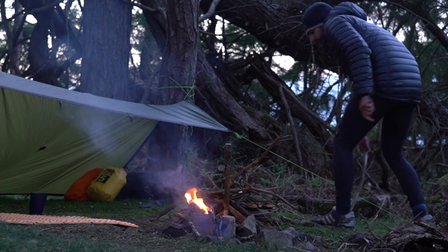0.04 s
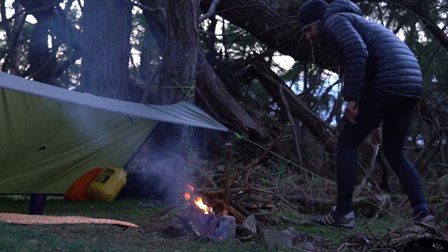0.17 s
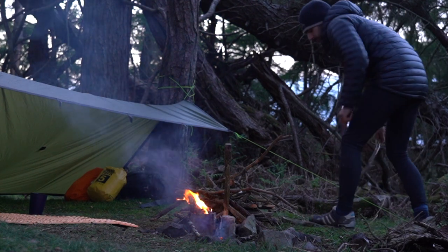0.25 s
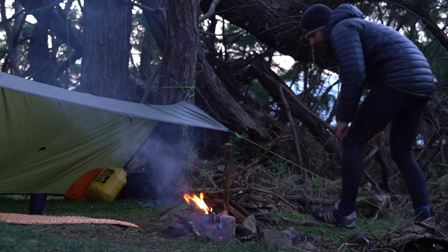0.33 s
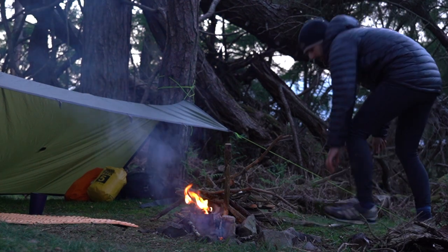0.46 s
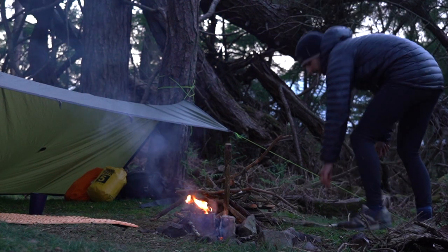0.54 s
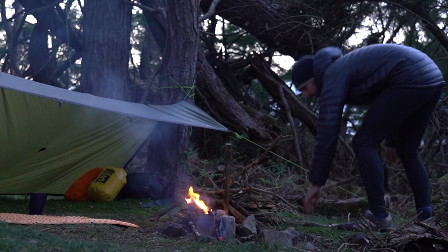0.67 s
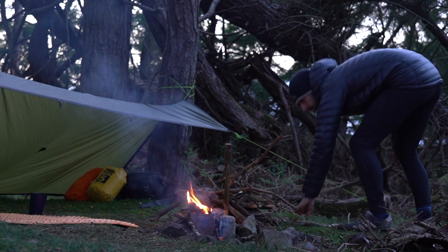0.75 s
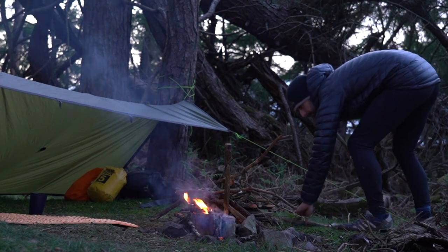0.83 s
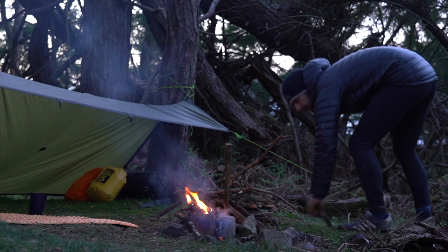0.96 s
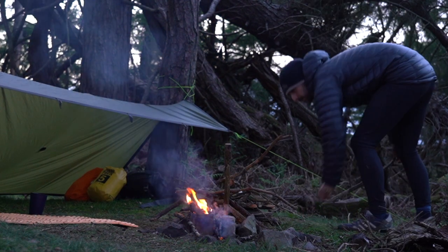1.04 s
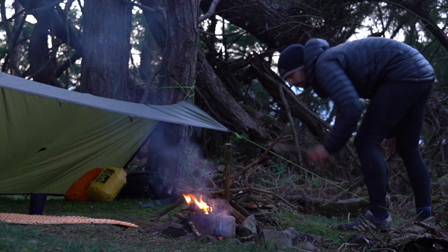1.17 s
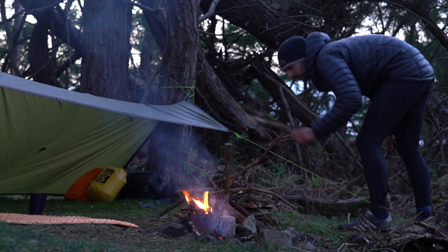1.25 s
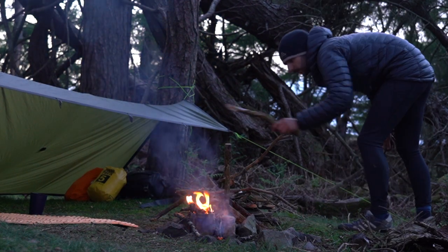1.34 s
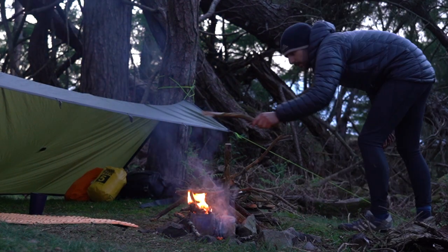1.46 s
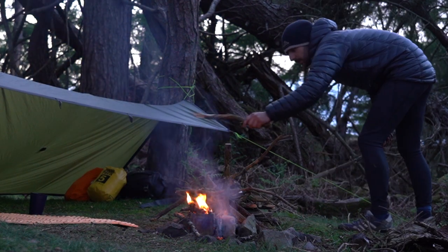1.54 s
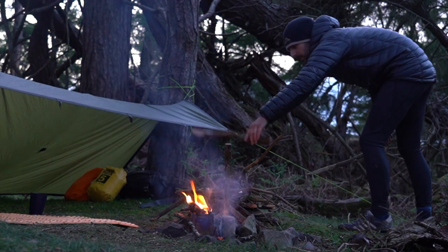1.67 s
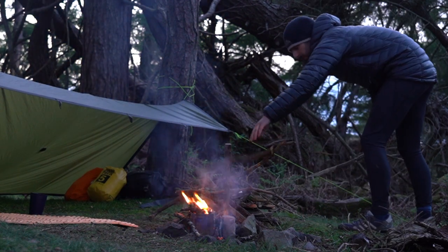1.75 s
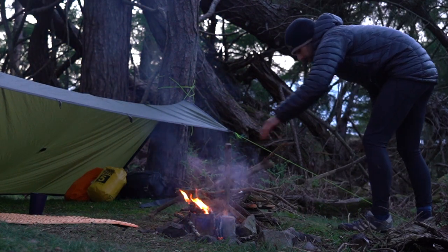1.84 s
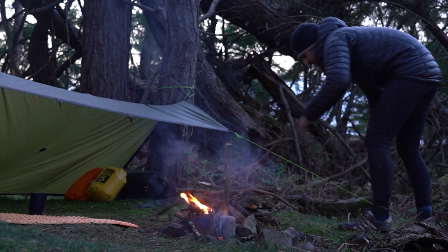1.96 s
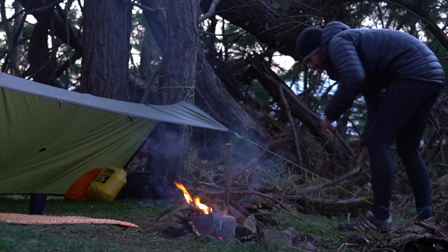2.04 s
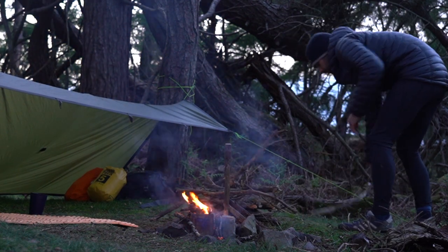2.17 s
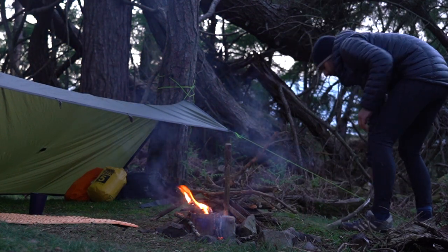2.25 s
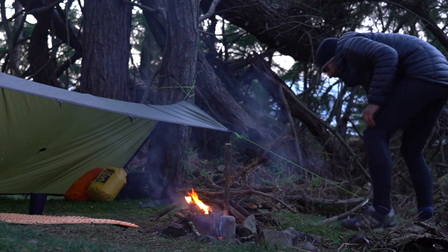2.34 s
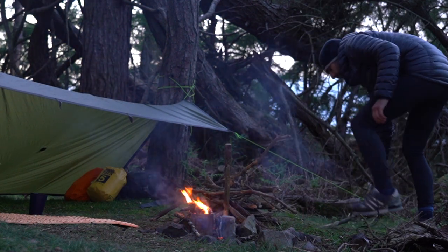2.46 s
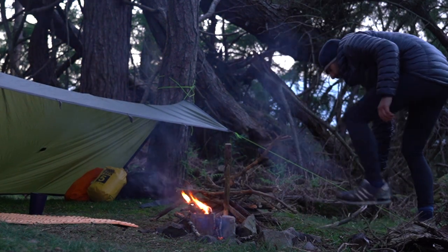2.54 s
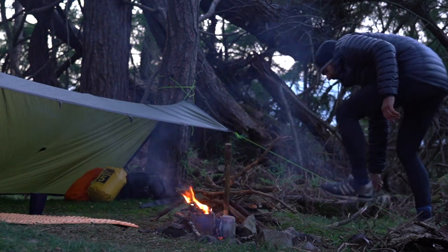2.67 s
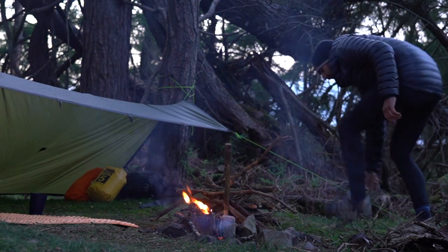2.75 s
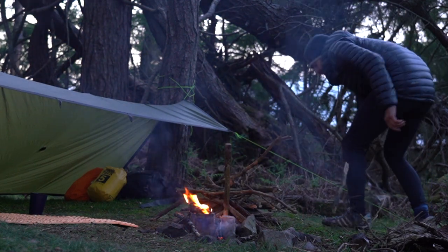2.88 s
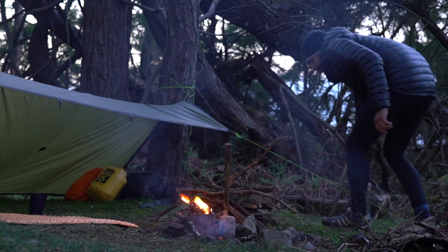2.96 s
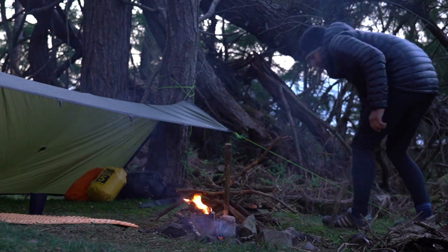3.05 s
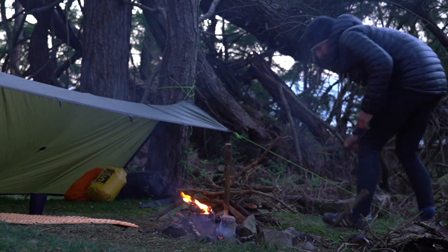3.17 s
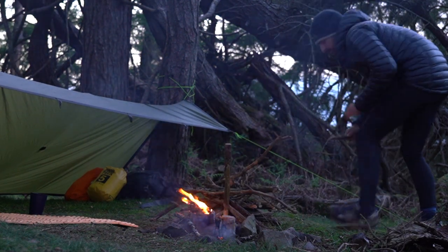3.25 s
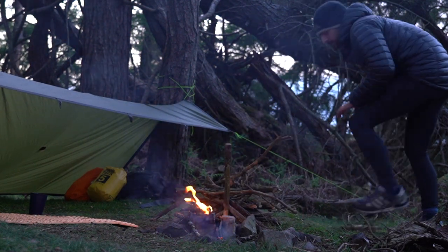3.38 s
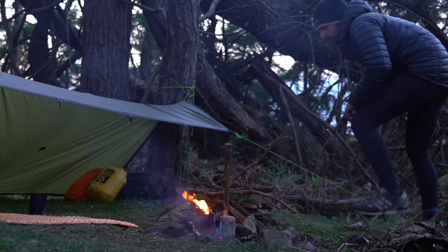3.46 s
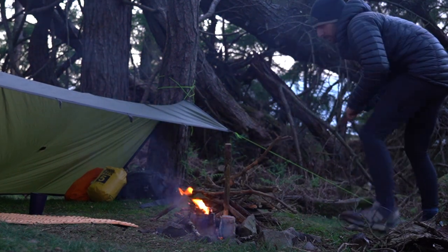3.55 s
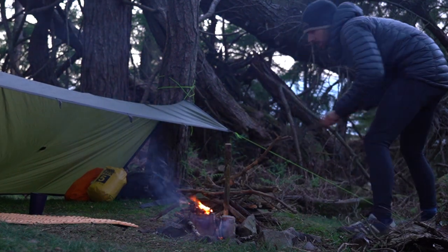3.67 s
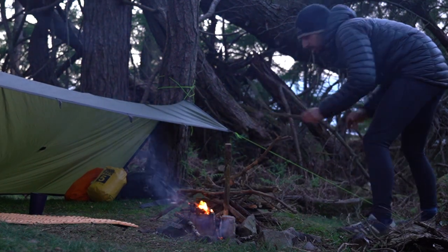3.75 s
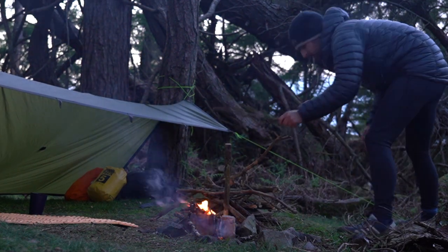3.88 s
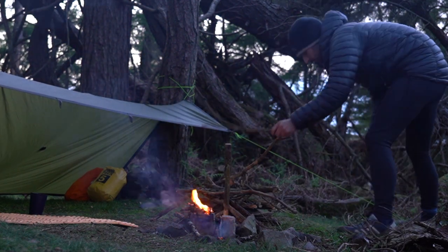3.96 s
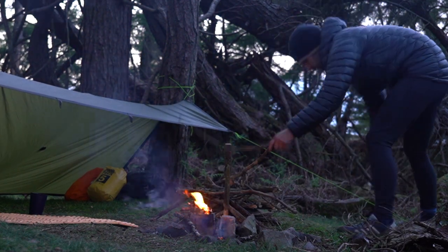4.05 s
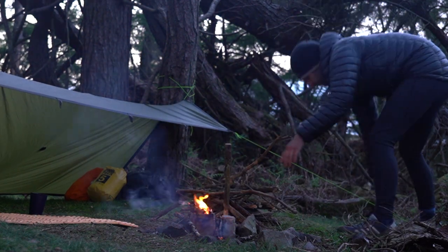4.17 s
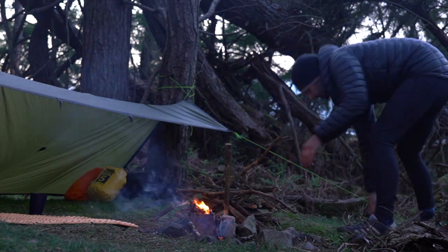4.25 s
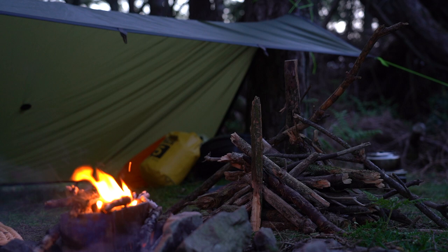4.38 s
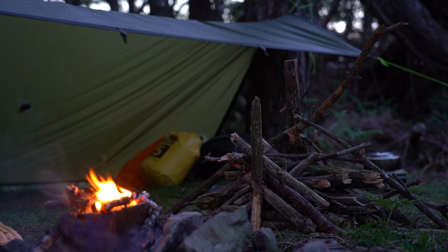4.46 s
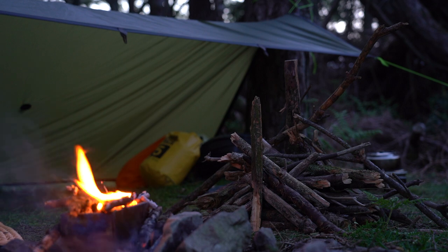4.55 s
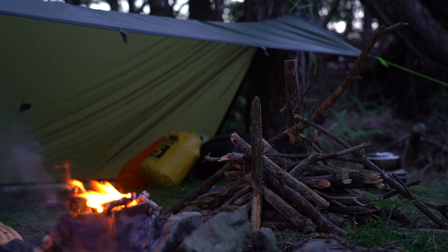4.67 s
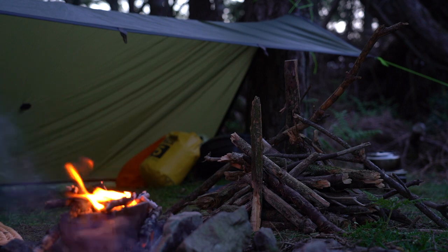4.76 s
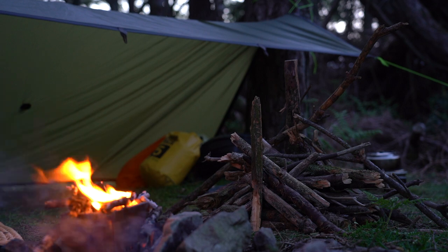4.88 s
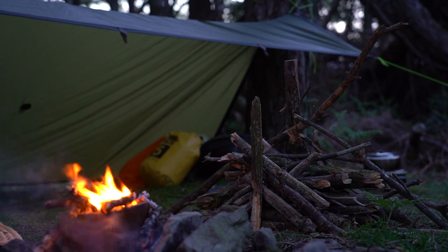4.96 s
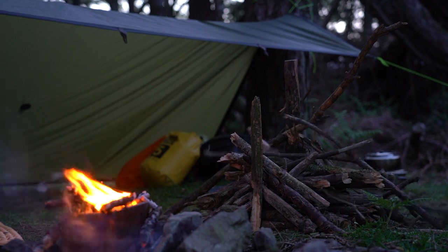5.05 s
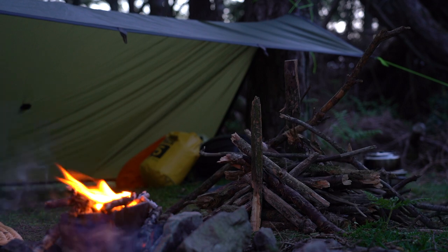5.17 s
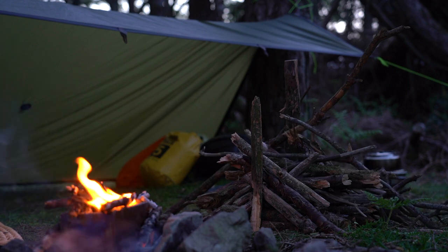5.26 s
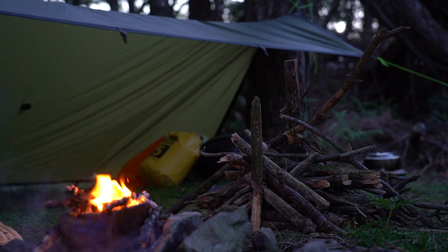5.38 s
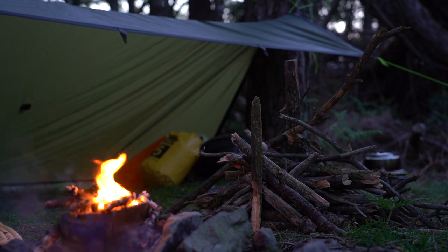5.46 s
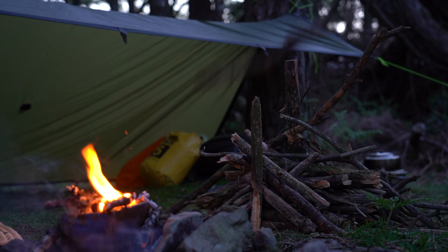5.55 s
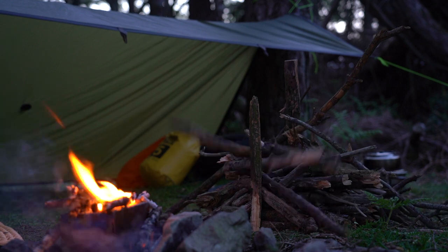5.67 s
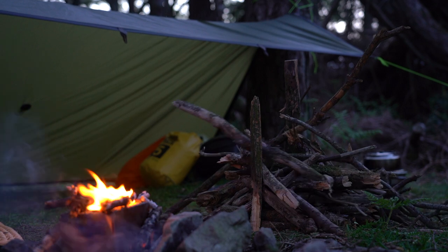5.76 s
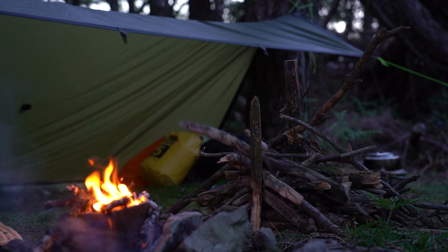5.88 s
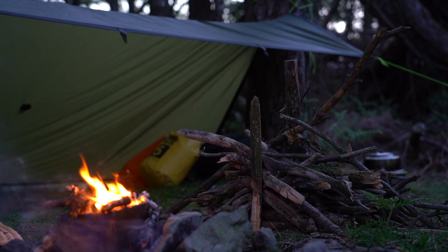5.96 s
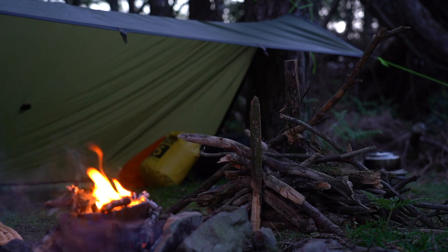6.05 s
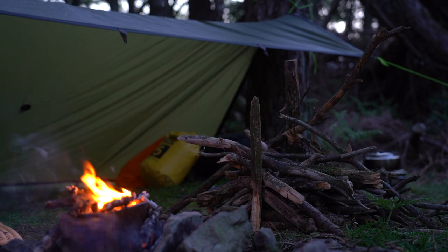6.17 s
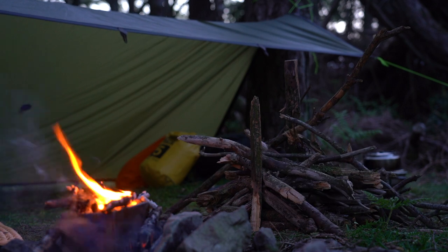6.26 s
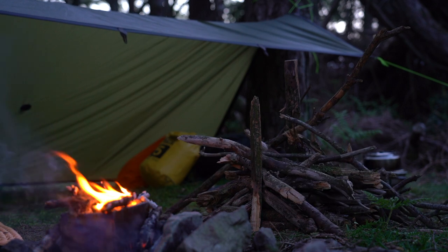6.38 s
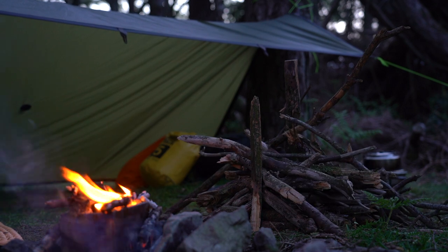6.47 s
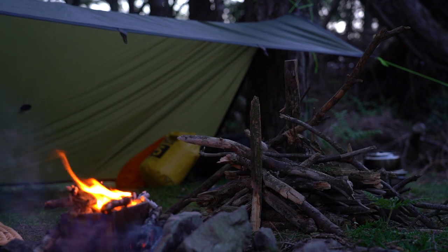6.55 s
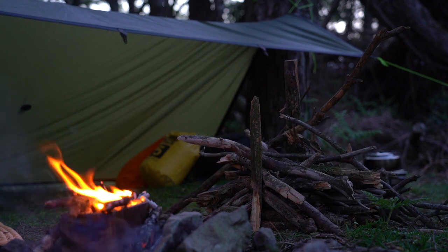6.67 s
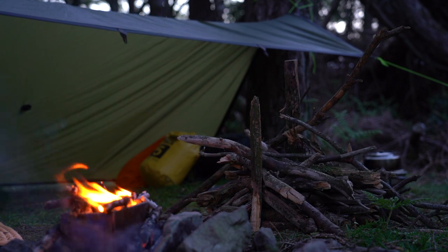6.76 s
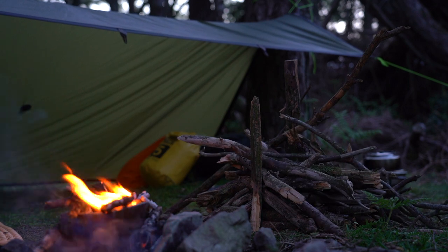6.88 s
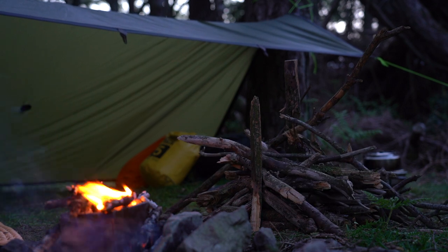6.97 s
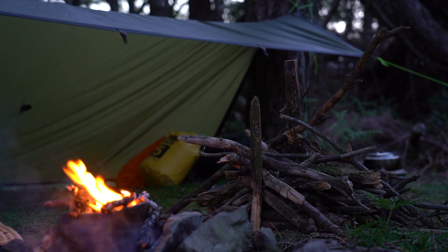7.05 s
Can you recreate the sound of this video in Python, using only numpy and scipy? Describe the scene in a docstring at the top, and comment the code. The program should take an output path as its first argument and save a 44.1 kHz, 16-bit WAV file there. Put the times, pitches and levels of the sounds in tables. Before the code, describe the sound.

A padded jacket swishes close by over a low, steady forest rush and tiny fire ticks. After nearly two seconds, sticks knock together, then a very loud snap near 2.8 seconds scatters splinters and dull thuds. Songbirds chirp between breaks. Two more crackling clusters come around 5 and 5.7 seconds, then small crunches. Wood is close and nearly dry; birds ring through the trees.

```python
"""Dead sticks are snapped by hand and underfoot at a camp among conifers, and the pieces clatter onto a woodpile.
Each break is a spray of tearing fibres that rings the stick; bark and twigs crunch in clumps of small fractures.
Wood and boots knock on the soil as damped low modes, and soles scrape the litter in uneven slips.
A padded jacket swishes in tiny slips of cloth, a small fire ticks in bright noise pops,
and songbirds call in sliding whistles over the steady filtered-noise rush of the forest."""
import sys
import numpy as np
from scipy import signal
from scipy.fft import rfft, irfft, next_fast_len
from scipy.io import wavfile

SR = 44100
rng = np.random.default_rng(int(sys.argv[2]) if len(sys.argv) > 2 else 0)


def put_to_file(sound):
    """Save the sound as 16-bit audio at rate SR, in the file named by the first command-line argument."""
    columns = np.atleast_2d(sound).T  # one column per channel
    safe = np.clip(columns, -1, 1)
    whole_steps = np.round(safe * 32767)
    wavfile.write(sys.argv[1], SR, whole_steps.astype(np.int16))


N = 313992
TIME = np.arange(N) / SR
BLOW = TIME[:2 ** 13]   # time within one blow
CUTOFF_HZ = 16000

# Far rush of the forest. Each row: frequency in Hz, density in dB per Hz.
FOREST_SPECTRUM = [(36, -11), (52, -3), (80, -9.5), (130, -9.5), (250, -9.5), (470, -14.5), (700, -14),
                   (910, -11), (1250, -20), (1700, -24), (2700, -47.5), (4500, -30), (7000, -46),
                   (16000, -75)]
# Puffs of air on the microphone. Each row: peak time in seconds, rise in s, fall in s, relative level in dB.
AIR_PUFFS = [(.29, .4, 0.097, -35), (3.9, 0.15, .2, -44), (5.49, 0.55, 0.53, -36.5), (6.81, 0.16, .25, -42)]
# Strokes of the jacket sleeves. Each row: peak time in seconds, rise in s, fall in s,
# relative swish level in dB, relative fine hiss level in dB.
SLEEVE_STROKES = [(0.0, .04, 0.073, -23.5, -39), (.05, 0.08, 0.19, -27.5, -64),
                  (.815, 0.5, 0.045, -33.5, -50), (1.02, 0.078, 0.18, -41, -50.5),
                  (1.72, 0.14, 0.048, -48, -55), (2.14, 0.35, 0.23, -42, -54),
                  (2.98, 0.092, 0.21, -31, -63), (4.18, 0.36, .15, -40.5, -54.5),
                  (4.385, 0.066, .045, -42.5, -47), (4.73, 0.43, 0.31, -39.5, -52.5),
                  (4.865, 0.022, 0.0097, -52, -45), (5.21, .08, 0.31, -44, -52),
                  (5.915, 0.066, .035, -46.5, -44.5), (6.05, 0.033, 0.013, -46, -38),
                  (6.655, 0.021, 0.046, -36.5, -48), (6.9, 0.24, 0.38, -48, -60)]
# Swish of the cloth. Each row: frequency in Hz, density in dB per Hz.
CLOTH_SPECTRUM = [(200, -26.5), (330, -8.5), (600, -6.5), (860, -1), (1150, -6.5), (1600, -5), (2200, -3),
                  (2900, -4.5), (3500, -2.5), (4200, -11), (5400, -11.5), (6300, -21), (10000, -33.5),
                  (15000, -44)]
# Fine hiss of the cloth. Each row: frequency in Hz, density in dB per Hz.
HISS_SPECTRUM = [(3000, -10), (5000, 7), (6400, -1), (9500, 1), (15000, -3)]
# Clearest dry ticks of embers and twigs. Each row: start in seconds, peak level in dB.
CLEAR_TICKS = [(1.096, -28), (1.1835, -28.5), (1.235, -31), (1.9424, -21), (2.1974, -22), (2.611, -27),
               (3.547, -21.5), (4.5286, -24), (4.6119, -32), (4.966, -22.5), (5.2685, -28), (5.842, -24.5),
               (6.119, -30), (6.412, -25), (6.6433, -24), (6.8053, -26), (6.8143, -17), (6.9664, -25)]
# Heavy wood and boots on the ground. Each row: start in seconds, relative level in dB, pitch in Hz, t60 in s.
GROUND_KNOCKS = [(.591, -21, 237, 0.04), (1.742, -19.5, 300, .07), (1.849, -13.5, 216, 0.036),
                 (2.016, -20, 330, .049), (2.035, -24, 187, 0.081), (2.294, -23, 150, 0.079),
                 (2.8071, -8, 260, 0.05), (2.811, -3, 400, 0.025), (2.859, -15.5, 108, 0.065),
                 (2.925, -14.5, 373, .076), (2.956, -12, 223, 0.023), (3.0, -22, 305, 0.11),
                 (3.05, -18, 332, 0.088), (3.112, -20.5, 142, 0.15), (3.147, -16, 250, 0.075),
                 (3.334, -12.5, 235, .074), (3.657, -14, 107, 0.065), (4.22, -22, 270, 0.04),
                 (5.029, -16, 303, 0.035), (5.046, -16, 199, .064), (5.145, -19.5, 107, 0.063),
                 (5.682, -14.5, 201, 0.12), (5.767, -9.5, 356, .047), (5.795, -17.5, 186, 0.064)]
# Soles and branches dragged over the litter. Each row: peak time in seconds, rise in s, fall in s, level in dB.
LITTER_SCUFFS = [(.594, 0.01, .012, -31.5), (3.29, .024, 0.033, -35), (4.488, 0.028, .019, -29),
                 (4.7, 0.14, 0.1, -33), (6.19, .08, 0.099, -38)]
# Dull colour of the litter. Each row: frequency in Hz, density in dB per Hz.
LITTER_SPECTRUM = [(150, 1.5), (350, -6.5), (800, 1.5), (1500, -10), (3500, -22), (12000, -34)]
# Single bird whistles. Each row: start in seconds, length in s, start pitch in Hz, end pitch in Hz,
# relative level in dB.
WHISTLES = [(1.786, 0.14, 2420, 2385, -45), (2.003, 0.0307, 3670, 3100, -32),
            (2.027, 0.0307, 3090, 3450, -35), (2.103, 0.29, 4260, 3794, -40),
            (2.414, .032, 3880, 5240, -42.5), (2.476, 0.043, 3100, 3540, -36),
            (2.513, 0.042, 4000, 4860, -46), (2.556, 0.2, 4620, 4310, -40.5), (3.73, 0.2, 2650, 2450, -53),
            (4.326, 0.15, 3637, 3560, -35.5), (4.376, 0.035, 4050, 3840, -37.5),
            (4.408, 0.047, 3520, 3110, -34), (4.482, .024, 4680, 6480, -34),
            (4.485, 0.036, 2680, 2670, -35.5), (4.502, 0.033, 3310, 4300, -34),
            (4.556, .02, 4790, 4330, -39.5), (5.369, 0.2, 2080, 2120, -49), (5.589, 0.099, 2430, 2500, -45)]
# Runs of repeated chirps. Each row: first start in seconds, end of the run in s, period in s, chirp length in s,
# start pitch in Hz, end pitch in Hz, relative level of the first in dB, step per repeat in dB.
CHIRP_RUNS = [(1.557, 1.8, .094, 0.0222, 3475, 3070, -41.5, 2.5),
              (4.583, 4.97, .0695, .03, 4300, 3046, -33, -1.2),
              (4.635, 4.95, .0695, 0.0266, 3430, 4500, -36, -6)]
# Sticks cracking or striking the pile. Each row: start in seconds, level in dB, body tilt in dB,
# treble tilt in dB, ring pitch in Hz, relative fade time in s.
STICK_CRACKS = [(1.737, -30.5, -12, -9.5, 1590, 0.0049), (1.842, -24.5, 1, 7, 3350, .0011),
                (1.8455, -20, 2, -24, 3600, 0.0046), (1.8498, -12.5, 1, -17.5, 586, .0036),
                (1.979, -12.5, 0, -31, 3230, 0.0034), (1.9865, -19.5, 2.5, -14, 1720, 0.0021),
                (2.2298, -26.5, -3, -10, 3330, 0.0029), (2.2671, -29.5, 3, -17, 3370, .0032),
                (2.476, -32, -2, 1, 3540, 0.0025), (2.809, -10, 1.5, -2.5, 600, 0.0021),
                (2.828, -20, -9, -3, 2600, .0046), (2.8333, -4, 15.5, 1, 3000, 0.0021),
                (2.873, -15.5, 0, -9, 3330, 0.0069), (2.9113, -24, 18, -7, 3020, .0025),
                (2.918, -23, 23, -9, 4680, .0036), (2.949, -19.5, 4, -5, 790, .0047),
                (3.04, -21.5, 12, -7, 2660, .005), (3.074, -15, -38, -9, 3480, 0.0051),
                (3.079, -14, -33, -0.5, 4720, .0013), (3.1782, -25, 19, -31, 920, .002),
                (3.33, -17.5, 2, -5.5, 3230, .0044), (3.639, -19.5, 12, -30, 805, .0038),
                (3.656, -21.5, 14.5, -13, 623, 0.0026), (4.185, -23.5, 12, -7, 3280, .0044),
                (4.218, -17, 5, -19, 2020, 0.0063), (4.2267, -15, 7, -17, 2410, 0.0038),
                (4.254, -15, -16, -4, 5420, 0.0027), (4.581, -26.5, 9, 4, 3550, .005),
                (4.92, -31.5, -1, -1, 2400, 0.0031), (5.025, -18.5, -11, -19, 1256, 0.0046),
                (5.0389, -14, -3, -8, 745, .005), (5.049, -19, -20, -21, 2780, .0037),
                (5.055, -8.5, -10, -9, 1606, 0.0015), (5.0675, -11, 1, -13, 1720, 0.0033),
                (5.1175, -20.5, 8, -16, 3400, .0044), (5.157, -23, 15, -18, 3080, 0.0059),
                (5.6512, -7.5, 8.5, -10.5, 2460, 0.0029), (5.676, -13.5, 3, -26, 1270, 0.0025),
                (5.6814, -19, -12, -33, 2760, .0022), (5.6967, -13, 6, -13, 2630, .002),
                (5.7013, -7, -.5, -9.5, 2530, .0036), (5.7463, -8.5, 3, -32, 1830, 0.0026),
                (5.751, -15.5, 5, -49, 1910, .0032), (5.786, -21, -4, -32, 3280, .005),
                (5.794, -17, -3, -20.5, 760, 0.0064), (5.881, -26.5, 6, -15, 2560, 0.006),
                (5.933, -22, -0.5, -23, 736, 0.0089), (6.5623, -27.5, 1, 5, 3460, .0028),
                (6.6885, -28.5, 8, 8, 4400, 0.003), (6.72, -23, -5, -31, 975, 0.0024),
                (6.7322, -23, -14, -6.5, 2210, .0064), (6.7439, -24, 10, -11, 1850, 0.0036),
                (6.7528, -21, -8, -27, 960, 0.0039), (6.86, -26.5, 6, -9, 4000, 0.0038)]
# Bending modes of a stick. Each row: multiple of the ring pitch, relative level in dB.
STICK_MODES = [(.3, -20), (.58, -2), (1, 6), (1.42, -0.5), (2.05, -23)]
# Bark and twigs being crushed. Each row: start in seconds, length in s, relative level in dB.
BARK_CRUSHES = [(2.783, 0.078, -31.5), (2.852, 0.059, -18), (2.975, .09, -34), (4.2, 0.037, -29),
                (5.028, 0.12, -25.5), (5.647, 0.079, -24.5), (5.767, 0.017, -36), (5.876, 0.079, -32.5),
                (5.985, 0.287, -37), (6.559, 0.033, -34.5), (6.725, 0.026, -34), (6.832, 0.017, -35)]
# Colour of the small fractures. Each row: frequency in Hz, density in dB per Hz.
CRUNCH_SPECTRUM = [(100, -6), (270, -9.5), (420, -18.5), (700, -6.5), (1400, -12), (3300, -5), (4300, -14),
                   (5400, -10), (6300, -16.5), (11000, -17), (16000, -22.5)]


def from_db(db):
    """Decibels to gain."""
    return 10 ** (np.asarray(db) / 20)


def rms_one(x):
    """Scales to an RMS of 1."""
    return x / np.sqrt(np.mean(x ** 2) + 1e-20)


def unit_energy(x):
    """Scales to a summed energy of 1."""
    return x / np.sqrt(np.sum(x ** 2) + 1e-20)


def add(out, s, sound):
    """Mixes a sound in at a time."""
    at = int(np.clip(round(s * SR), 0, N - 1))
    out[at:at + len(sound)] += sound[:N - at]


def coloured(x, points):
    """Causal (minimum-phase) filter through (Hz, dB) points, falling 12 dB an octave below the first."""
    size = 2 * next_fast_len(len(x) // 2 + 1)
    hz, db = np.transpose(sorted(map(tuple, points)))
    f = np.maximum(np.arange(size // 2 + 1) * SR / size, 10)
    gain = from_db(np.interp(np.log(f), np.log(hz), db)) * np.minimum(f / hz[0], 1) ** 2
    # folding the cepstrum forward in time gives minimum phase
    cepstrum = irfft(np.log(gain))
    cepstrum[1:size // 2] *= 2
    cepstrum[size // 2 + 1:] = 0
    response = np.exp(rfft(cepstrum))
    return irfft(rfft(x, size) * response)[:len(x)]


def drift(rate):
    """Random wander of spread 1, with `rate` knots a second."""
    knots = rng.standard_normal(int(N / SR * rate) + 2)
    return rms_one(np.interp(TIME * rate, np.arange(len(knots)), knots))


def grains(per_s, spread_db, size):
    """Random clicks of uneven strength."""
    strength = from_db(spread_db * np.minimum(rng.exponential(1, size), 4))
    return (rng.random(size) < per_s / SR) * strength * rng.choice([-1, 1], size)


def ring(x, hz, t60):
    """One decaying mode, as a two-pole resonator."""
    radius = from_db(-60 / (t60 * SR))
    w = 2 * np.pi * min(hz, CUTOFF_HZ) / SR
    return signal.lfilter([0, np.sin(w)], [1, -2 * radius * np.cos(w), radius * radius], x + 1e-18)


def swell(s, rise, fall):
    """A smooth rise to 1 and fall back."""
    return np.exp(-((TIME - s) / np.where(TIME < s, rise, fall)) ** 2)


def swells(rows):
    """Swells of (peak s, rise s, fall s, dB), added by power, as a gain per sample."""
    return np.sqrt(sum((from_db(db) * swell(s, rise, fall)) ** 2 for s, rise, fall, db in rows))


def forest(rush_db=-39.5, calm_db=-57.5, gust_trim_db=-2.5):
    """A steady far rush, with soft lumps of air on the microphone."""
    rush = rms_one(coloured(rng.standard_normal(N), FOREST_SPECTRUM)) * from_db(.5 * drift(5.13))
    air = rms_one(coloured(rng.standard_normal(N), [(25, 4.5), (55, -17), (130, -19.5), (2000, -77)]))
    puffs = np.hypot(from_db(calm_db), swells(AIR_PUFFS))
    return from_db(rush_db) * rush + from_db(gust_trim_db) * puffs * air * from_db(3.8 * drift(7.9))


def jacket(rest_swish_db=-46.5, rest_hiss_db=-57, swish_trim_db=0.5, hiss_trim_db=3.0):
    """Fabric slides in countless tiny slips; each stroke brings a swish and a fine hiss."""
    # the cloth never quite stops moving
    swish, hiss = from_db(rest_swish_db), from_db(rest_hiss_db)
    for s, rise, fall, stroke_db, fine_db in SLEEVE_STROKES:
        speed = swell(s, rise, fall)
        swish = np.hypot(swish, from_db(stroke_db) * speed)
        hiss = np.hypot(hiss, from_db(fine_db) * speed)
    slips = rms_one(coloured(grains(14000, 4.0, N), CLOTH_SPECTRUM)) * from_db(1.13 * drift(45))
    fine = rms_one(coloured(grains(14000, 3.0, N), HISS_SPECTRUM)) * from_db(1.5 * drift(60))
    return from_db(swish_trim_db) * swish * slips + from_db(hiss_trim_db) * hiss * fine


def ticks(fade_s=0.002, ember_db=-60.5):
    """Tiny bright pops of fading noise, and the fire's fainter random crackle."""
    out = np.zeros(N)
    colour = [(1200, -6), (4500, 11.5), (6500, 1), (12000, 5.5), (16000, -2)]
    for s, db in CLEAR_TICKS:
        pop = coloured(rng.standard_normal(len(BLOW)) * np.exp(-BLOW / fade_s), colour)
        add(out, s, from_db(db) * pop / np.abs(pop).max())
    crackle = rms_one(coloured(grains(25, 5.0, N), colour))
    return out + from_db(ember_db) * crackle


def knocks(trim_db=-1.5, soil_db=-7.5, soil_fade_s=0.013):
    """A damped low mode of the wood, with a dull puff from the soil."""
    out = np.zeros(N)
    soil_colour = [(90, -2.0), (330, 5.0), (800, -14.0), (3000, -53), (12000, -70)]
    for s, db, hz, t60 in GROUND_KNOCKS:
        attack = 1 - np.exp(-BLOW / 0.0015)
        mode = np.sin(2 * np.pi * hz * BLOW) * from_db(-60 * BLOW / t60) * attack
        soil = coloured(rng.standard_normal(len(BLOW)) * np.exp(-BLOW / soil_fade_s), soil_colour)
        add(out, s, from_db(db + trim_db) * (mode + from_db(soil_db) * soil / np.abs(soil).max()))
    return out


def scuffs():
    """Short dull scrapes, made of uneven slips."""
    return swells(LITTER_SCUFFS) * rms_one(coloured(grains(750, 3.6, N), LITTER_SPECTRUM))


def chirps():
    """A trill repeats one note at an even pace, growing or fading."""
    notes = []
    for first, until, period, length, start_hz, end_hz, db, step_db in CHIRP_RUNS:
        for k, s in enumerate(np.arange(first, until, period)):
            notes.append((s, length, start_hz, end_hz, db + k * step_db))
    return notes


def birds(waver=0.0063, burr=.11, glide_s=.05):
    """Whistles that slide and settle; a wide slide warbles more, and a whistle longer than the glide less."""
    out, wobble = np.zeros(N), drift(300)
    for s, length, start_hz, end_hz, db in WHISTLES + chirps():
        u = np.linspace(0, 1, int(length * SR))
        depth = waver + burr * abs(np.log(end_hz / start_hz)) * min(glide_s / length, 1)
        # a longer whistle holds its end pitch
        slide = np.maximum(1 - u * max(length / glide_s, 1), 0)
        warble = 1 + depth * np.roll(wobble, -int(s * SR))[:len(u)]
        hz = (end_hz + (start_hz - end_hz) * slide ** 1.16) * warble
        envelope = np.sqrt(2 * np.abs(np.sin(np.pi * u ** 0.75)))
        add(out, s, from_db(db) * envelope * np.sin(2 * np.pi * np.cumsum(hz) / SR))
    return out


def cracks(ring_db=-4.5, ring_cycles=45.0, tone_db=10.0, splinter_db=-10.0, splinter_fades=3.0, splinter_hz=6000):
    """Fibres part in a quick spray, duller splinters follow, and the stick rings in its bending modes."""
    out = np.zeros(N)
    grid = np.geomspace(170, 16000, num=48)
    dull = signal.butter(1, splinter_hz, fs=SR, output="sos")
    for s, db, body_db, treble_db, hz, fade in STICK_CRACKS:
        tear = unit_energy(grains(30000, 1.0, len(BLOW)) * np.exp(-(BLOW / (0.82 * fade)) ** 2))
        splinters = signal.sosfilt(dull, grains(4000, 2.5, len(BLOW)))
        splinters = unit_energy(splinters * np.exp(-BLOW / (splinter_fades * fade)))
        force = tear + from_db(splinter_db) * splinters
        corners, levels = np.transpose([
            (170, body_db - 4.5), (430, body_db - 4.0), (750, body_db), (1250, -3.3), (3300, -0.7),
            (4200, 0.4 * treble_db), (5400, 7.5 + 0.89 * treble_db), (6400, treble_db - 2.5),
            (11000, treble_db + 0.23), (16000, treble_db - 9.5)])
        # the stick radiates best around its ring pitch
        tone = tone_db * np.exp(-(np.log2(grid / hz) / 0.36) ** 2)
        colour = np.interp(np.log(grid), np.log(corners), levels) + tone
        snap = unit_energy(coloured(force, zip(grid, colour)))
        # every mode lasts the same number of cycles, so higher ones die sooner
        modes = sum(from_db(mode_db) * unit_energy(ring(force, hz * ratio, ring_cycles / (hz * ratio)))
                    for ratio, mode_db in STICK_MODES)
        crack = unit_energy(snap + from_db(ring_db) * unit_energy(modes))
        # the level is the RMS if all the energy fell within 5.6 ms
        add(out, s, from_db(db) * np.sqrt(0.0056 * SR) * crack)
    return out


def squeeze(s, length, db, attack_s=0.015, sag_db_per_s=20, release_s=0.027):
    """Pressure builds quickly, sags as the twigs give way, then lets go."""
    t = np.maximum(TIME - s, 0)
    release = np.exp(-np.maximum(t - length, 0) / release_s)
    return np.minimum(t / attack_s, 1) * from_db(db - sag_db_per_s * t) * release


def crunch(per_s=4000, clump_db=2.0, twig_db=-6.0, twig_t60=0.0085):
    """Dense small fractures come in clumps; each rings one of many twigs."""
    pressure = sum(squeeze(*row) for row in BARK_CRUSHES)
    force = grains(per_s, 3.2, N) * pressure * from_db(clump_db * drift(220))
    pitches = np.geomspace(700, 5200, num=14)
    dealt = rng.integers(0, len(pitches), N)   # which twig each fracture rings
    twigs = sum(unit_energy(ring(force * (dealt == k), hz, twig_t60)) for k, hz in enumerate(pitches))
    sound = unit_energy(coloured(force, CRUNCH_SPECTRUM)) + from_db(twig_db) * unit_energy(twigs)
    return unit_energy(sound) * np.sqrt(np.sum(pressure ** 2))


def trees(x, t60, echoes_per_s):
    """Trunks and branches scatter many small dull echoes."""
    t = TIME[:SR]
    echoes = grains(echoes_per_s, 1.4, len(t)) * from_db(-60 * t / t60) * (1 - np.exp(-t / 0.0039))
    colour = [(120, 8.5), (1000, -1.5), (3500, 1), (7000, -13.5), (15000, -21)]
    return signal.fftconvolve(x, coloured(unit_energy(echoes), colour))[:N]


def scene():
    """Wood breaks close by and nearly dry; the birds are heard both directly and through the trees."""
    wood = cracks() + knocks() + crunch() + ticks() + scuffs()
    song = birds()
    near = wood + from_db(-17.5) * trees(wood, t60=0.43, echoes_per_s=3000)
    far = from_db(-0.5) * song + from_db(-2.0) * trees(song, t60=0.8, echoes_per_s=1700)
    return (near + far + jacket() + forest())[None]


def record(dry):
    """The loudest cracks overload the input, which bends smoothly towards its limit; the top is cut."""
    clipped = dry / (1 + (dry / .82) ** 6) ** (1 / 6)
    top_cut = signal.ellip(12, .1, 100, CUTOFF_HZ, fs=SR, output="sos")
    return signal.sosfilt(top_cut, clipped)


dry = scene()
out = record(dry)
put_to_file(out)
```